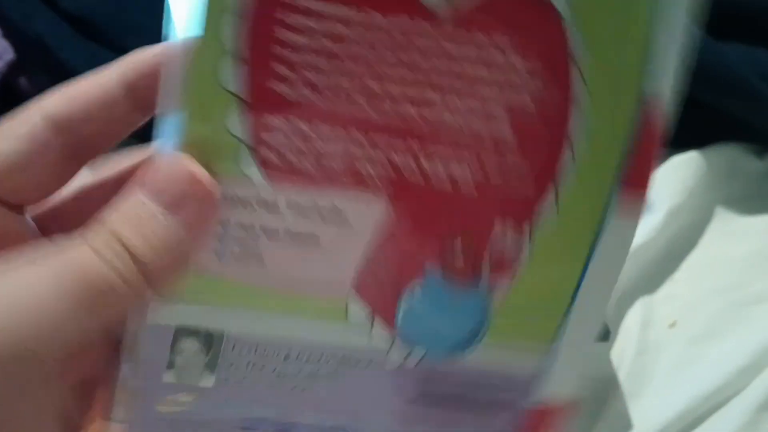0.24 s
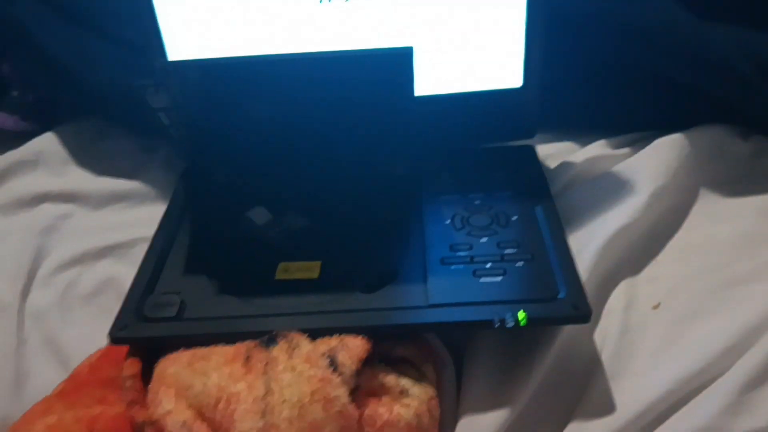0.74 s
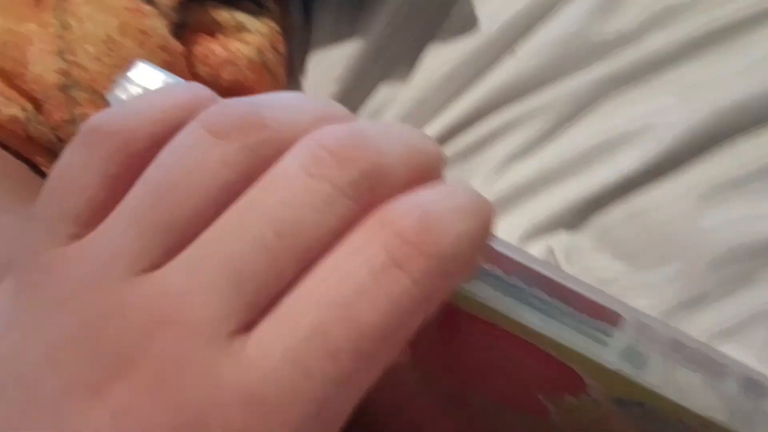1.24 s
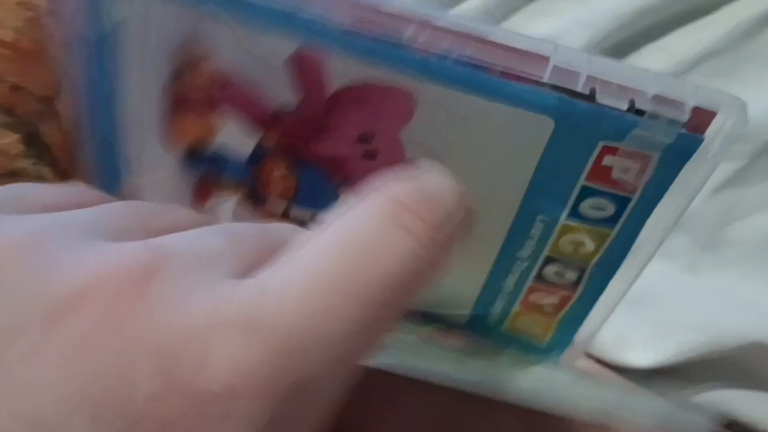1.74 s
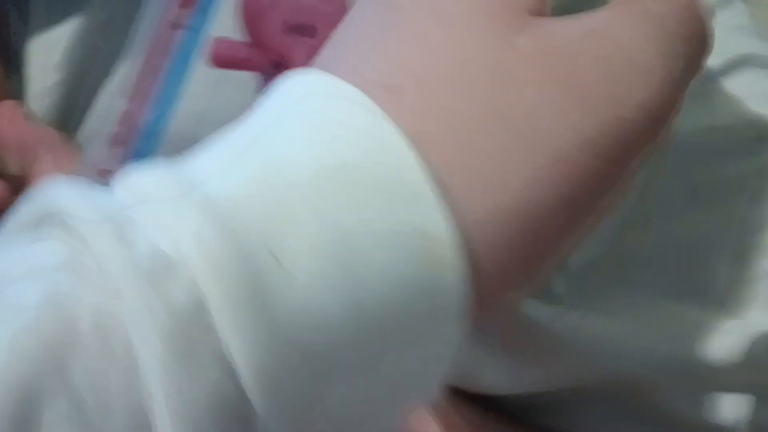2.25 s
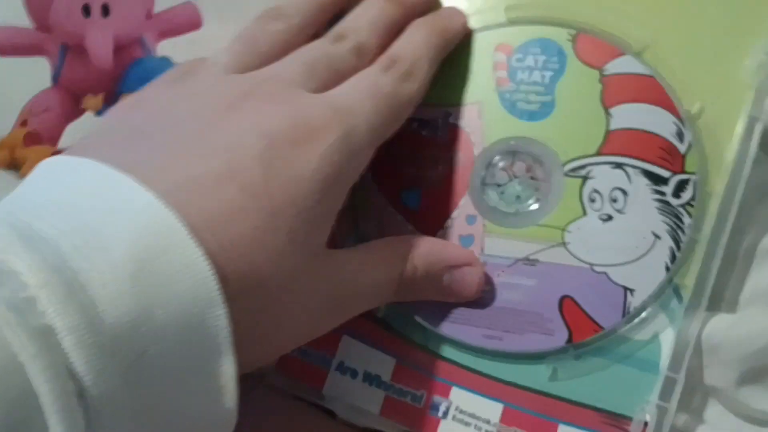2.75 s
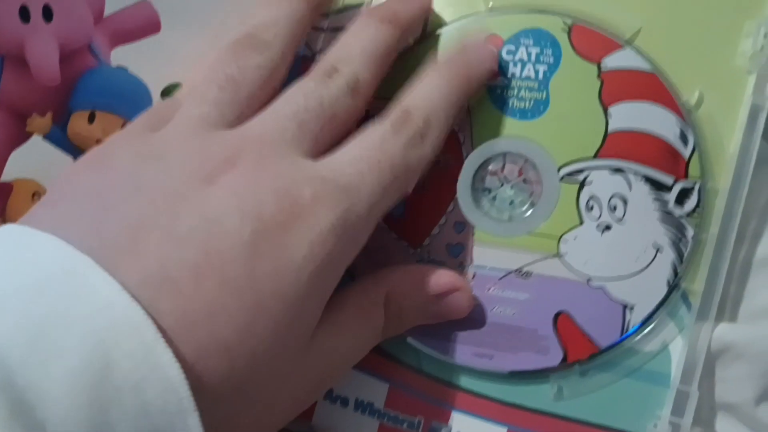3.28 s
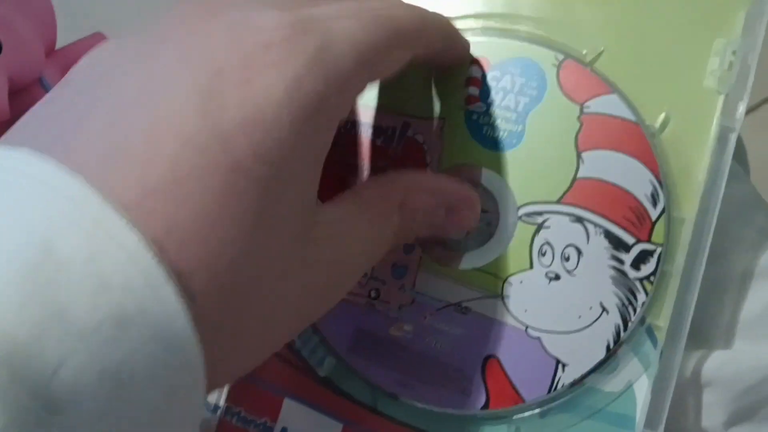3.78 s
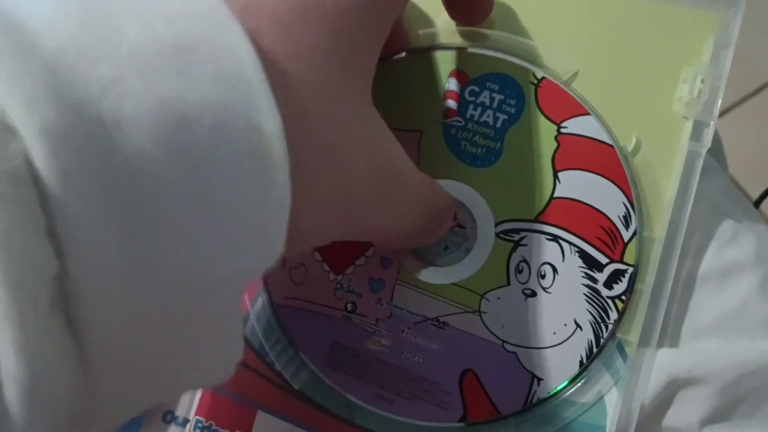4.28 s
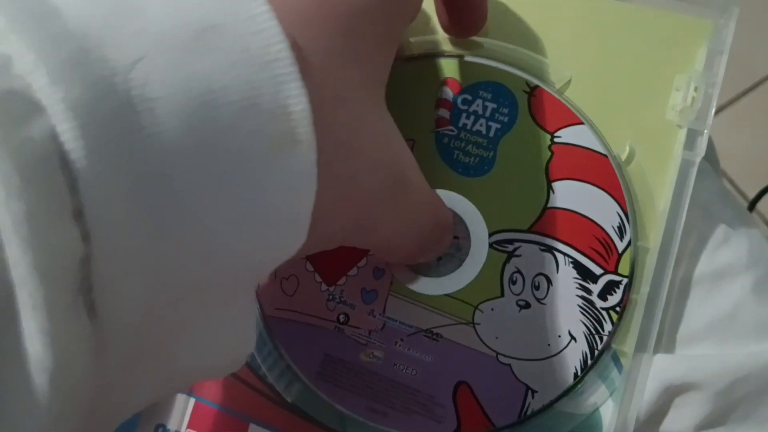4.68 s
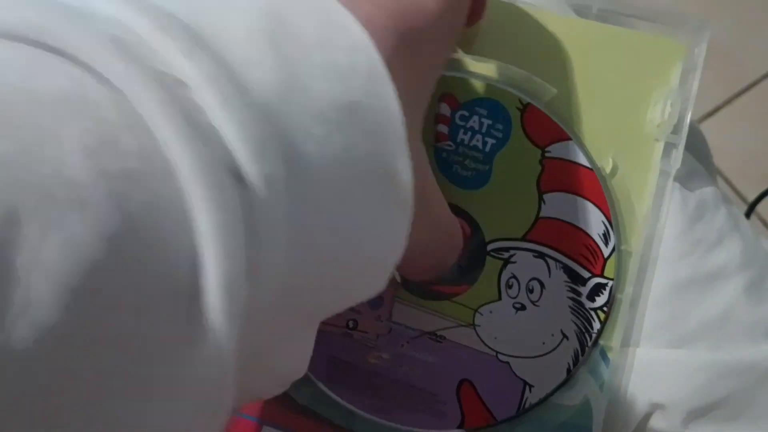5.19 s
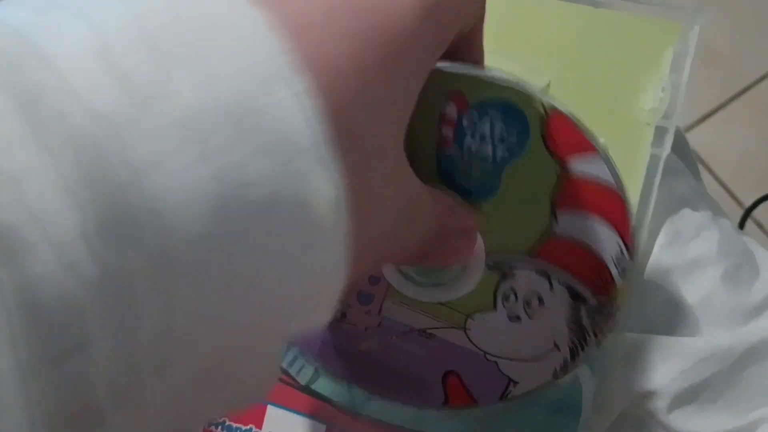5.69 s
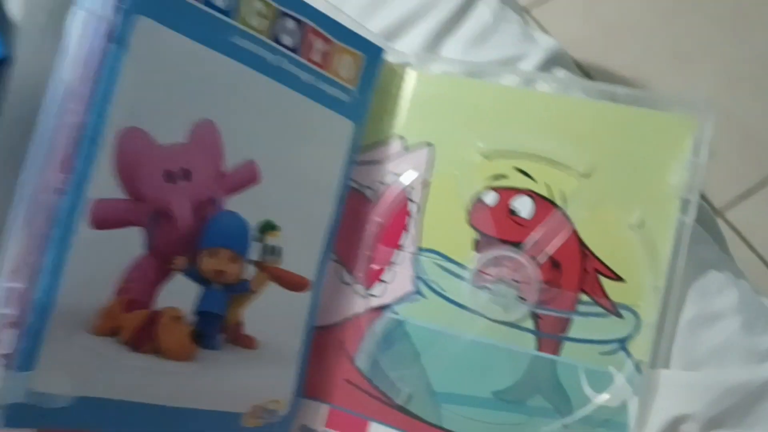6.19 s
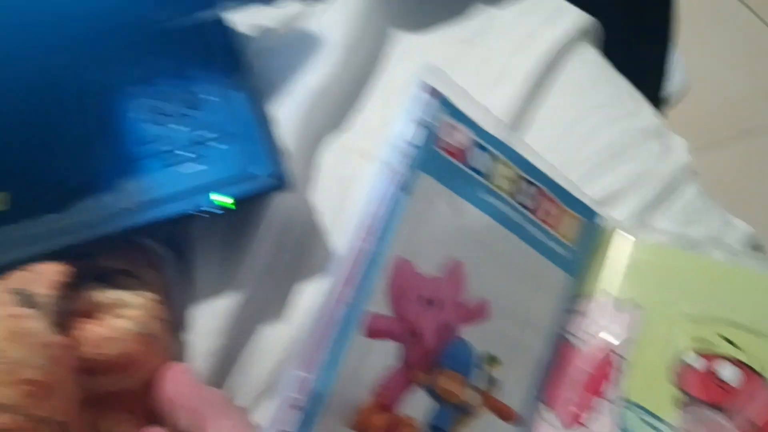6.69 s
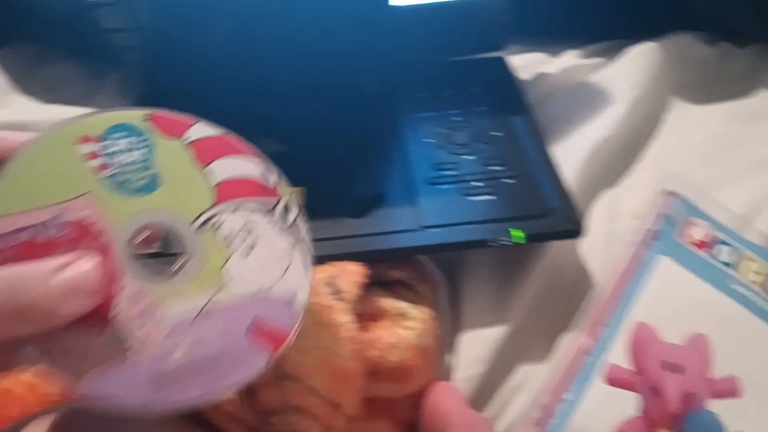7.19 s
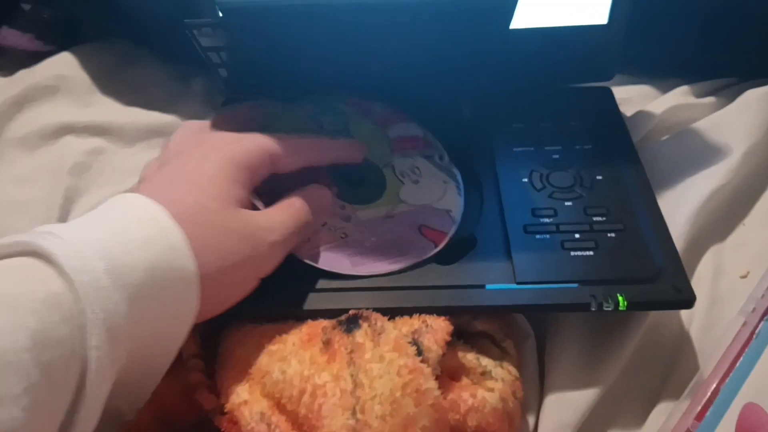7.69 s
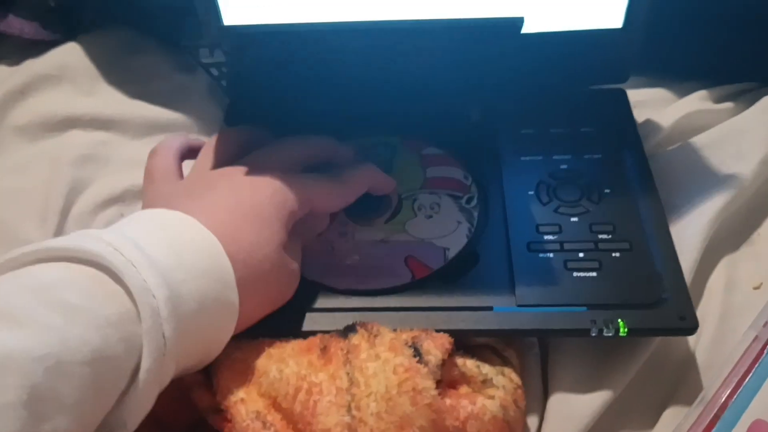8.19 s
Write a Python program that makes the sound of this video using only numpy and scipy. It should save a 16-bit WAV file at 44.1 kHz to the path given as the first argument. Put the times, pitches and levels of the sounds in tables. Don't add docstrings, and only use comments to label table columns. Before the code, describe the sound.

Close to a handheld phone in a small soft room, a thin plastic case ticks as it is turned, then snaps open with a loud double crack. The lid rattles and thuds on bedding, fingers tap and rustle. After a quiet pause the disc pops sharply off its hub; later it scrapes and clicks onto a player spindle, and a latch snaps. Faint air noise and mains hum lie beneath.

```python
import sys
import numpy as np
from scipy import signal
from scipy.fft import rfft, irfft
from scipy.io import wavfile
from scipy.ndimage import uniform_filter1d

SR = 44100
rng = np.random.default_rng(int(sys.argv[2]) if len(sys.argv) > 2 else 0)


def volts_from_db(level):
    exponent = np.asarray(level, float) / 20
    return 10 ** exponent


def dump(signal):
    limited = np.clip(np.atleast_2d(signal).T, -1, 1)
    pcm = np.round(limited * 32767).astype(np.int16)
    wavfile.write(sys.argv[1], SR, pcm)


N = 372204
SIZE = 4096
HZ = np.fft.rfftfreq(SIZE, 1 / SR)


def unit(x):
    return x / np.sqrt(np.mean(x ** 2))


def on_log(hz, rows):
    f, value = np.transpose(rows)
    return np.interp(np.log(hz + 1), np.log(f), value)


def resonances(hz, modes, detune=1):
    f, width, db = np.transpose(modes)
    f = f * detune
    sign = (-1.) ** np.arange(len(f))
    s = 1j * hz[:, None]
    return (sign * volts_from_db(db) * s * width / (s * s + s * width + f * f)).sum(axis=1)


def edge(hz, kind):
    return signal.sosfreqz(signal.butter(4, hz, kind, fs=SR, output="sos"), worN=HZ, fs=SR)[1]


def noise(gain):
    return unit(irfft(rfft(rng.standard_normal(N)) * gain, N))


def walk(rate):
    k = int(SR / rate)
    held = np.repeat(rng.standard_normal(N // k + 1), k)
    return 1.07 * uniform_filter1d(uniform_filter1d(held, k), k)[:N]


def add(out, sound, s, pan_db):
    i = int(s * SR)
    n = min(sound.shape[-1], N - i)
    out[:, i:i + n] += sound[..., :n] * volts_from_db(np.array([[pan_db], [-pan_db]]) / 2)


# (frequency [Hz], level [dB])
MIC = [(25, -31), (60, 3.5), (150, 12.5), (3300, -2.5), (4400, -6.5), (6800, 1), (9300, -10),
       (10500, -16.5), (15300, -22.5), (16200, -60)]


def microphone(hz):
    return volts_from_db(on_log(hz, MIC))


def slips(rows, pan_db, t60, modes, bed_db, lag_ms, rise_ms, shove_ms, crack_pan_db):
    out, t = np.zeros((2, N)), np.arange(SIZE) / SR
    low = edge(750., "low") * edge(110., "high")
    middle = edge(750., "high") * edge(3800., "low")
    high = edge(3800., "high")
    delay_ms = np.array([[1 + lag_ms], [1]])
    ports = np.exp(-2j * np.pi * HZ * delay_ms / 1000) * microphone(HZ)
    shove = rfft(t * np.exp(-t * 1000 / shove_ms))
    for at, body_db, thump_db, crack_db in rows:
        grit, other = rng.standard_normal((2, SIZE)) * volts_from_db(2.9 * rng.standard_normal(SIZE))
        push = (1 - np.exp(-t * 1000 / rise_ms)) * volts_from_db(-60 * t / max(t60, .002))
        detune = 1 + .012 * rng.standard_normal(len(modes))
        ring = resonances(HZ, modes, detune) + volts_from_db(bed_db)
        scrape = rfft(np.array([grit, grit + 2.07 * other]) * push)
        scrape = scrape / np.sqrt(uniform_filter1d(np.abs(scrape) ** 2, size=100))
        thump = (low * shove, thump_db - .1, 0)
        body = (middle * scrape, body_db - 9.0, pan_db)
        crack = (high * scrape, crack_db + 0.56, pan_db + crack_pan_db)
        for spectrum, db, side_db in (thump, body, crack):
            fade = np.clip(8 - 8 * t / t[-1], 0, 1)
            wave = irfft(spectrum * ring * ports, SIZE) * fade
            peak = np.sqrt(uniform_filter1d(np.mean(wave ** 2, axis=0), size=130).max())
            add(out, wave * volts_from_db(db) / peak, at - .002, side_db)
    return out


# (frequency [Hz], width [Hz], level [dB])
CASE_MODES = [(190, 170, 15), (450, 115, 19.5), (984, 23, -2.5), (1640, 440, 8), (2222, 162, 10.5),
              (2620, 380, 12), (3450, 480, -11), (5300, 510, -38), (6370, 1200, -14), (7600, 1100, -81)]
# (time [s], body peak [dB], thump [dB], crack [dB])
TURN_HITS = [(0.219, -30.5, -42, -65), (0.26, -29.5, -53, -52.5), (0.277, -38, -53, -60),
             (0.325, -25.5, -41, -44.5), (0.496, -25, -54, -44), (0.5, -13.5, -63, -35.5),
             (0.503, -22, -45, -45), (0.506, -35, -30, -57), (0.549, -48, -46, -67), (0.56, -30, -51, -67),
             (0.711, -37, -64, -59), (0.94, -38, -58, -64), (1.016, -29, -56, -53)]
SNAP_HITS = [
    (1.475, -5, -17, -31),
    (1.483, -14, -22.5, -28),
    (1.4855, -2, -25, -35),
    (1.492, -7.5, -25.5, -30),
    (1.496, -7.5, -48, -24.5),
]
LID_HITS = [(1.533, -13.5, -40, -35.5), (1.572, -21.5, -35.5, -41.5), (1.615, -20.5, -33, -31.5),
            (1.624, -27, -46, -55), (1.657, -26, -51, -48), (1.682, -29.5, -36, -44.5),
            (1.715, -22, -35.5, -41), (1.765, -24, -44, -45.5), (1.816, -42, -41, -58),
            (1.894, -45, -54, -61), (2.043, -34, -44, -56), (2.128, -32, -32, -58)]
NAIL_HITS = [
    (2.188, -23, -36.5, -37.5),
    (2.216, -20, -42, -44),
    (2.231, -28, -40, -44),
]
GRIP_HITS = [(2.418, -38, -58, -58), (2.444, -35, -47, -56), (2.506, -23, -42, -34),
             (2.516, -24.5, -41, -37.5), (2.59, -28, -62, -54), (2.619, -31, -46, -58),
             (2.677, -30.5, -40, -51), (2.719, -38, -35, -58), (3.278, -27.5, -46, -50.5),
             (3.727, -37, -43, -59), (3.743, -26.5, -39.5, -54), (3.767, -38, -55, -52),
             (3.861, -39, -52, -61), (3.868, -29.5, -45, -51)]


def disc_case():
    case = dict(modes=CASE_MODES, bed_db=0.5, rise_ms=0.32, shove_ms=0.17, crack_pan_db=2.7)
    hits = slips(TURN_HITS, pan_db=-5, t60=0.013, lag_ms=-0.076, **case)
    hits += slips(SNAP_HITS, pan_db=-7.0, t60=0.0115, lag_ms=-0.17, **case)
    hits += slips(LID_HITS, pan_db=-9, t60=0.023, lag_ms=-0.13, **case)
    hits += slips(NAIL_HITS, pan_db=-4, t60=.026, lag_ms=-0.12, modes=CASE_MODES[4:], bed_db=-6.5,
                  rise_ms=.45, shove_ms=0.2, crack_pan_db=3.0)
    hits += slips(GRIP_HITS, pan_db=-0.5, t60=0.038, lag_ms=-0.095, **case)
    return hits


# (frequency [Hz], width [Hz], level [dB])
HUB_MODES = [(237.4, 90, -11.5), (822, 254, -2.5), (1873, 170, 3.5), (2750, 170, 5.5), (3160, 220, 1),
             (5930, 610, -19), (6750, 450, -15.5), (9400, 1100, -2)]
# (time [s], body peak [dB], thump [dB], crack [dB])
HUB_HITS = [
    (5.028, -23, -30.5, -47),
    (5.153, -17, -25.5, -37.5),
    (5.163, -27, -59.5, -44.5),
    (5.238, -24, -53, -53),
    (5.478, -53.5, -52, -69),
    (5.5, -37.5, -45, -67),
    (5.683, -41, -40, -55),
    (5.704, -39, -42, -57),
    (5.735, -47, -43, -60),
    (5.815, -47, -64, -65),
]
POP_HITS = [
    (5.2478, -7.5, -40, -21),
    (5.2498, -4, -18.5, -14.5),
    (5.256, -23, -33.5, -41),
]


def disc_off_hub():
    hits = slips(HUB_HITS, pan_db=1.0, t60=0.0098, lag_ms=-0.079, modes=HUB_MODES, bed_db=-18,
                 rise_ms=0.36, shove_ms=0.18, crack_pan_db=-3.5)
    hits += slips(POP_HITS, pan_db=0.9, t60=0.01, lag_ms=0.086, modes=HUB_MODES, bed_db=-14,
                  rise_ms=0.34, shove_ms=0.35, crack_pan_db=-3)
    return hits


# (frequency [Hz], width [Hz], level [dB])
SPINDLE_MODES = [(580, 290, 5), (1000, 180, -2), (1330, 540, -0.5), (1860, 200, -14), (2095, 280, 10),
                 (2523, 820, 13.5), (2720, 980, 10.5), (6660, 550, -37), (8200, 1900, -11),
                 (9100, 570, -18)]
# (time [s], body peak [dB], thump [dB], crack [dB])
SPINDLE_HITS = [
    (7.484, -27.5, -38.5, -49),
    (7.529, -32, -58, -54),
    (7.558, -30, -53, -62),
    (7.621, -37, -55, -55),
    (7.704, -25.5, -52, -61),
    (7.731, -6, -35, -29),
    (7.74, -11, -23, -37),
]
SEAT_HITS = [
    (7.722, -16, -28.5, -38),
    (7.835, -39, -32, -30.5),
    (7.841, -41, -38, -49),
]


def disc_onto_spindle():
    spindle = dict(modes=SPINDLE_MODES, bed_db=-17.5, rise_ms=1.0, shove_ms=0.19, crack_pan_db=3)
    hits = slips(SPINDLE_HITS, pan_db=-4, t60=0.05, lag_ms=-0.19, **spindle)
    hits += slips(SEAT_HITS, pan_db=-2.5, t60=0.024, lag_ms=-0.11, **spindle)
    return hits


# (frequency [Hz], width [Hz], level [dB])
LATCH_MODES = [(325, 340, -17), (578, 53, 8.5), (1246, 97, 0), (1433, 110, 2.5), (2350, 220, -10.5),
               (2870, 75, -7), (5110, 200, -24.5), (6600, 1100, -18), (6930, 640, -18), (9650, 1300, -47)]
# (time [s], body peak [dB], thump [dB], crack [dB])
LATCH_HITS = [
    (8.085, -40, -52, -48),
    (8.089, -27, -47, -41),
    (8.0922, -7.5, -17, -19.5),
    (8.1015, -19.5, -23, -30),
]


def latch():
    return slips(LATCH_HITS, pan_db=-6.5, t60=0.011, lag_ms=-0.079, modes=LATCH_MODES, bed_db=-21.5,
                 rise_ms=0.52, shove_ms=0.13, crack_pan_db=4)


# (time [s], peak [dB], pitch [Hz], t60 [s])
THUDS = [
    (1.52, -29, 133, 0.034),
    (1.612, -31, 363, 0.058),
    (2.112, -26.5, 132, 0.3),
    (2.716, -49, 188, 0.073),
    (2.719, -33, 625, 0.022),
    (3.277, -38.5, 125, 0.12),
    (5.499, -41, 330, 0.052),
    (5.685, -36, 240, 0.07),
    (5.71, -39, 242, 0.055),
    (2.1007, -23.5, 302, 0.04),
]


def thuds():
    out, t = np.zeros((2, N)), np.arange(4 * SIZE) / SR
    for at, db, hz, t60 in THUDS:
        envelope = volts_from_db(db - 60 * t / t60) * (1 - np.exp(-t / 0.00023))
        add(out, envelope * np.sin(2 * np.pi * hz * t), at, 0)
    return out


# (start [s], held [s], level [dB], release t60 [s])
SLIDES = [
    (1.497, 0.0093, -31, 0.067),
    (1.532, 0.015, -33, 0.26),
    (1.614, 0.0092, -44, 0.051),
    (1.68, 0.1, -44, 0.07),
    (7.485, 0.0094, -34.5, 0.63),
    (7.558, 0.115, -35, 0.092),
    (7.747, 0.017, -23.5, 0.094),
    (7.836, 0.008, -25, 0.088),
]
# (frequency [Hz], width [Hz], level [dB])
SLIDE_MODES = [(900, 90, -3), (1400, 150, -9), (1650, 80, -4), (2150, 120, -3), (2600, 140, 3),
               (3850, 150, -10)]


def slide(hz):
    t = np.arange(N) / SR
    level = 0
    for at, held, db, t60 in SLIDES:
        attack = np.clip((t - at) / 0.0014 + 1, 0, 1)
        level = level + attack * volts_from_db(db - 60 * np.maximum(t - at - held, 0) / t60)
    colour = resonances(hz, SLIDE_MODES) + volts_from_db(-14) / (1 + (hz / 3300) ** 4) + volts_from_db(-33)
    colour = np.abs(colour) * microphone(hz) * hz / (hz + 450)
    shared = noise(colour)
    pair = np.array([shared, np.roll(shared, 7)]) + 0.6 * np.array([noise(colour), noise(colour)])
    return pair * level * volts_from_db(3.8 * walk(45) + 2.9 * walk(400) - 6.5)


# (time [s], length [s], level [dB])
STROKES = [
    (0.35, 0.4, -90),
    (1.11, 0.83, -72),
    (1.64, 0.12, -72),
    (2.05, 0.33, -65.5),
    (2.24, 0.2, -63.5),
    (2.786, 0.47, -79),
    (3.8, 0.8, -79),
    (5.906, 0.27, -82),
    (6.2, 0.5, -79),
]
# (time [s], length [s], level [dB])
BRUSHES = [(0.603, 0.037, -68), (0.812, 0.046, -69.5), (1.013, 0.037, -67), (1.127, 0.067, -78),
           (1.93, 0.049, -63), (2.127, 0.021, -59), (2.221, 0.024, -48), (2.537, 0.185, -60),
           (5.71, 0.067, -64.5), (0.49, 0.008, -43.5), (7.72, 0.0073, -46)]
# (frequency [Hz], density [dB per Hz])
RUSTLE_COLOUR = [(2650, -17.5), (4500, -1.5), (5480, -4.5), (6560, 0), (7450, 1.5), (9070, -9),
                 (9820, -15.5), (12000, -18), (16000, -39)]


def rustle(hz):
    t = np.arange(N) / SR
    level = volts_from_db(-75.5)
    for rows, power in ((STROKES, 2), (BRUSHES, 4)):
        for at, length, db in rows:
            level = level + volts_from_db(db) * np.exp(-(2 * (t - at) / length) ** power)
    pair = np.array([noise(volts_from_db(on_log(hz, RUSTLE_COLOUR))) for _ in range(2)])
    return pair * level * volts_from_db(2 * walk(200))


def room(dry):
    t60_s, level_db = 0.23, -10
    t = np.arange(SR // 2) / SR
    tail = rng.standard_normal((2, len(t))) * volts_from_db(-60 * t / t60_s) * (1 - np.exp(-t / 0.0032))
    tail = signal.sosfilt(signal.butter(1, 350, "high", fs=SR, output="sos"), tail)
    tail = tail / np.sqrt(np.sum(tail ** 2, axis=1, keepdims=True))
    return volts_from_db(level_db) * signal.fftconvolve(dry, tail, axes=1)[:, :N]


# (frequency [Hz], density [dB per Hz])
HISS_COLOUR = [(5000, -26), (7500, -1.5), (8600, 0.5), (9300, -16), (10000, -22), (12000, -22),
               (17000, -60.5)]


def player_hiss(hz):
    level_db, facing_s, swing_s = -76, 6.63, 0.6
    facing = np.exp(-((np.arange(N) / SR - facing_s) / swing_s) ** 2)
    pair = np.array([noise(volts_from_db(on_log(hz, HISS_COLOUR))) for _ in range(2)])
    return pair * volts_from_db(level_db) * facing


# (frequency [Hz], density [dB per Hz])
AIR = [(22, -41), (42, -12.5), (74, -17.5), (108, -8), (170, -10.5), (242, -6.5), (270, -12.5), (344, -11),
       (641, -18), (840, -9), (911, -11.5), (2350, -16.5), (3150, -24), (4370, -37.5), (8140, -44.5),
       (16000, -91)]
# (frequency [Hz], likeness [0-1])
AIR_LIKENESS = [(60, 0.86), (130, 0.75), (290, 0.95), (640, 0.35), (1410, 0.05), (3100, 0), (6820, 0),
                (15000, 0)]
# (frequency [Hz], width [Hz], level over the background [dB])
HUM = [
    (104, 7.5, -12.5),
    (121.7, 9, -11.5),
    (203, 6.5, -6),
    (240.1, 12, -3.5),
]


def background(hz, flicker_db=1):
    before_db, after_db, pop_s, sink_s = -48, -52, 5.2, 0.23
    t = np.arange(N) / SR
    alike = np.clip(on_log(hz, AIR_LIKENESS), 0, 1)
    air = 0
    for centre in 30 * 2. ** np.arange(10):
        octave = np.cos(np.clip(np.log2((hz + 1) / centre), -1, 1) * np.pi / 2)
        band = volts_from_db(on_log(hz, AIR)) * octave
        mid, side = (irfft(rfft(rng.standard_normal(N)) * band * np.sqrt(1 + k * alike), N) for k in (1, -1))
        air = air + np.array([mid + side, mid - side]) * volts_from_db(flicker_db * walk(6.9))
    hum = 0
    for f, width, db in HUM:
        waver = 0.5 * noise(resonances(hz, [(f, width, 0)]) ** 2)
        hum = hum + volts_from_db(db) * (waver + np.sin(2 * np.pi * f * t))
    sunk = 1 - np.exp(-np.maximum(t - pop_s, 0) / sink_s)
    return (volts_from_db(2.5) * unit(air) + hum) * volts_from_db(before_db + (after_db - before_db) * sunk)


# (frequency [Hz], left minus right [dB])
SHADE = [(110, -1.4), (380, -1.3), (700, -3.5), (1290, -5), (2380, -8.5), (4400, -3.5), (8120, -7.5),
         (13000, 8.5)]


def shade(pair, hz):
    return irfft(rfft(pair) * volts_from_db(np.array([[1], [-1]]) * on_log(hz, SHADE) / 2), N)


def self_noise():
    return volts_from_db(-85) * rng.standard_normal((2, N))


def scene():
    hz = np.fft.rfftfreq(N, 1 / SR)
    hits = disc_case() + disc_off_hub() + disc_onto_spindle() + latch()
    around = slide(hz) + rustle(hz) + player_hiss(hz) + background(hz)
    return hits + room(hits) + thuds() + shade(around, hz) + self_noise()


def top_cut(x):
    return signal.sosfilt(signal.butter(12, 16530, fs=SR, output="sos"), x)


def record(dry):
    rounded = np.tanh(0.57 * dry) / 0.66
    ends = signal.butter(4, [45, 16400], "band", fs=SR, output="sos")
    return top_cut(signal.sosfilt(ends, rounded))


dry = scene()
out = record(dry)
dump(out)
```